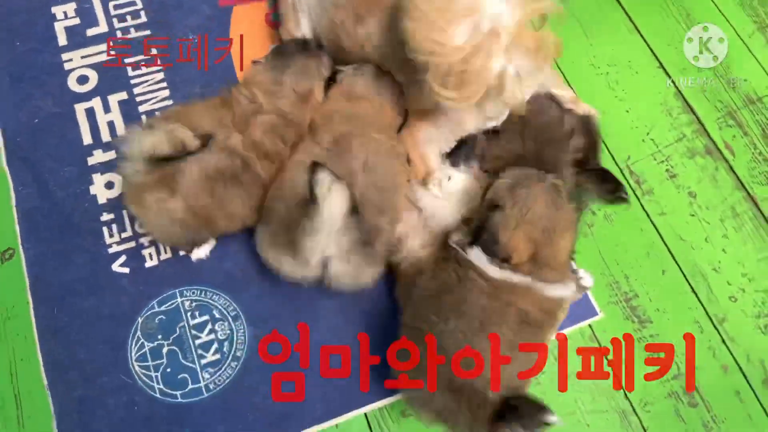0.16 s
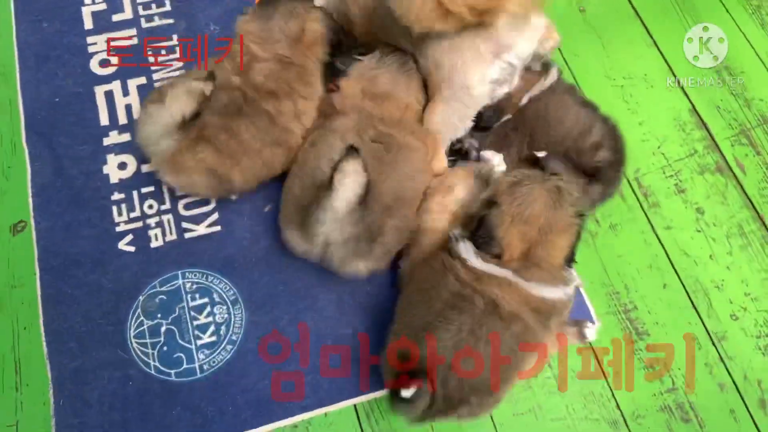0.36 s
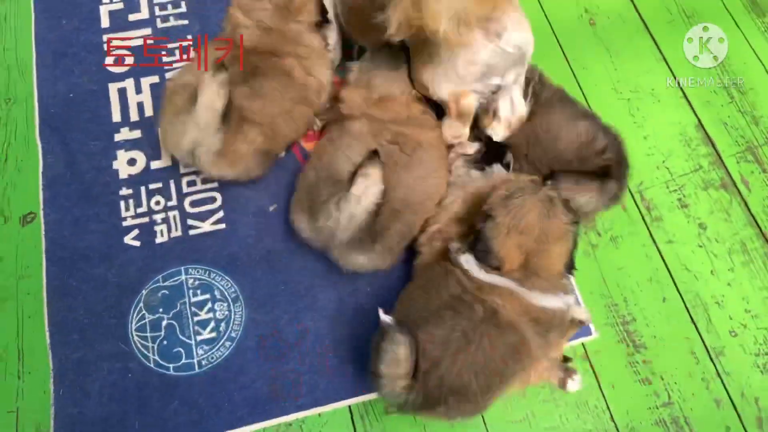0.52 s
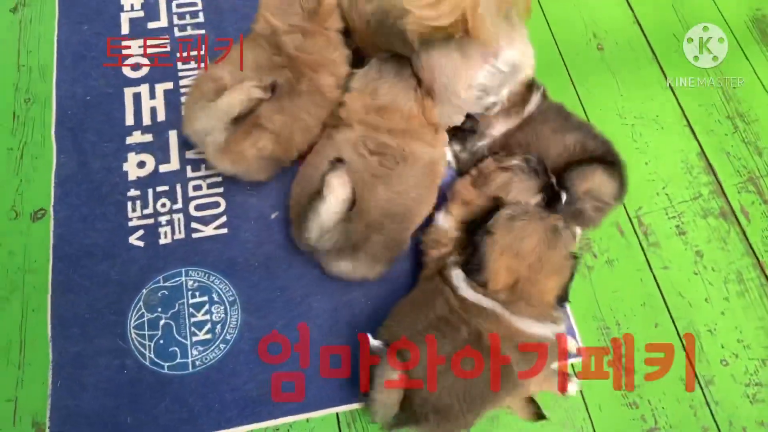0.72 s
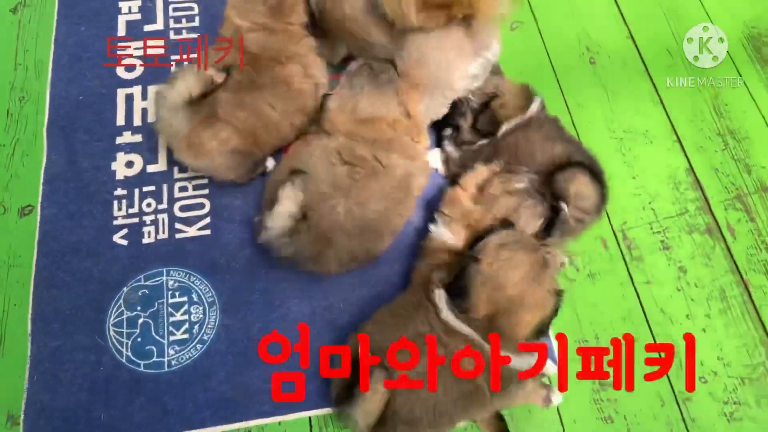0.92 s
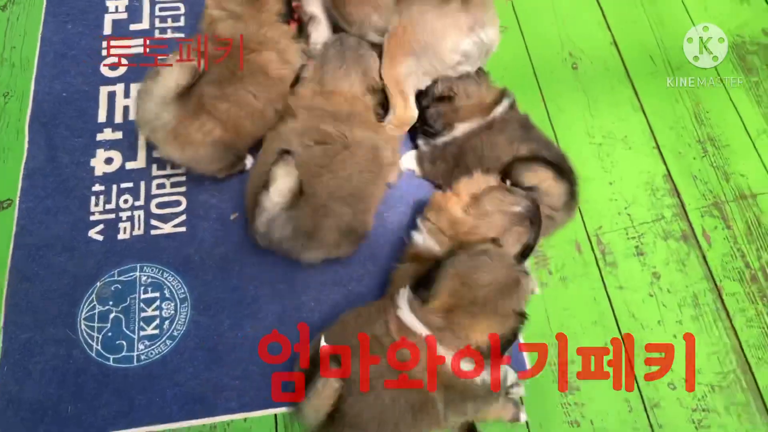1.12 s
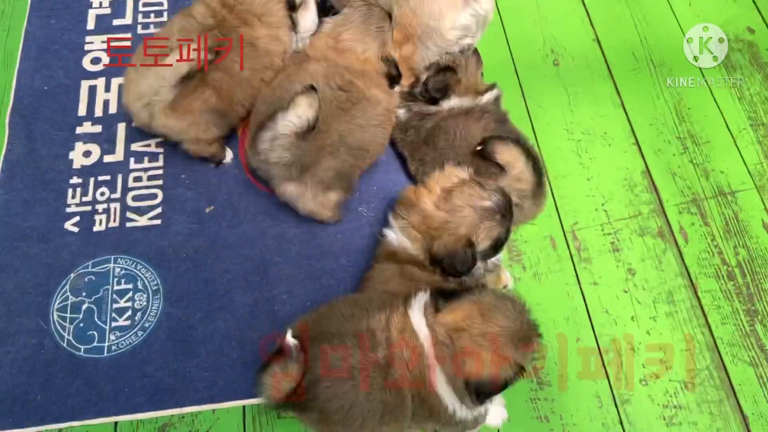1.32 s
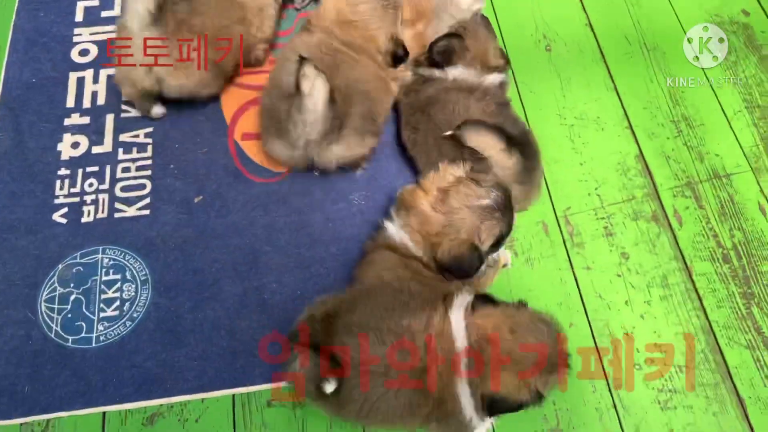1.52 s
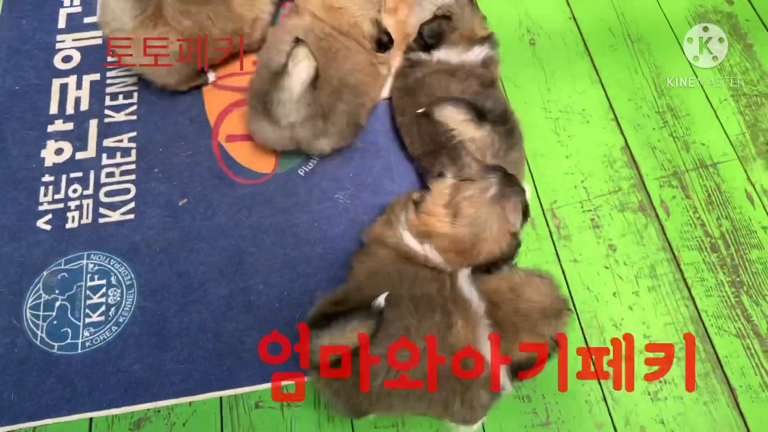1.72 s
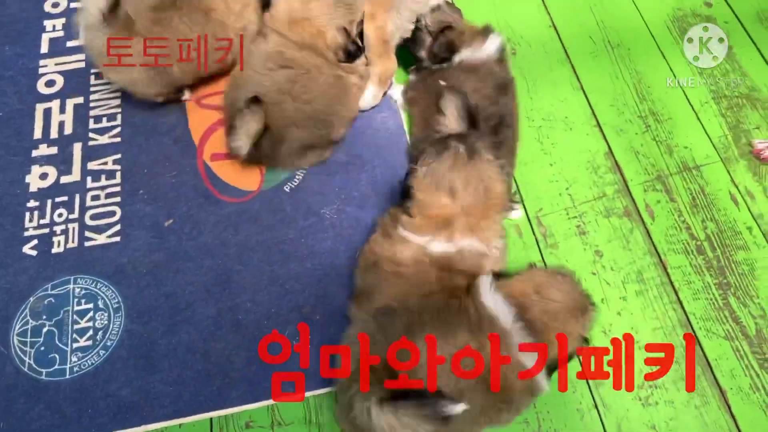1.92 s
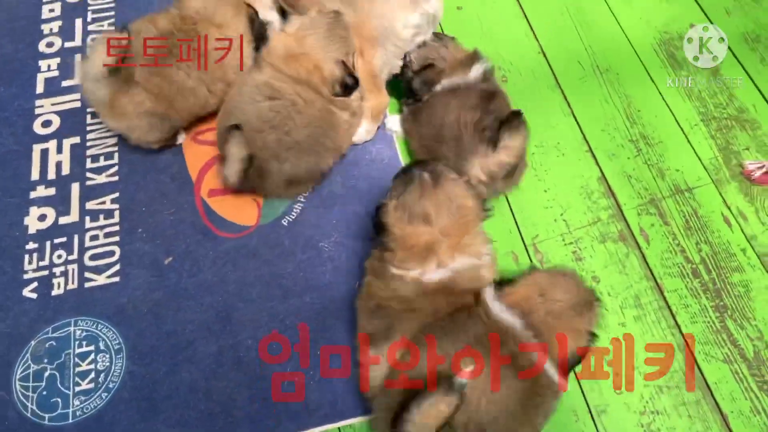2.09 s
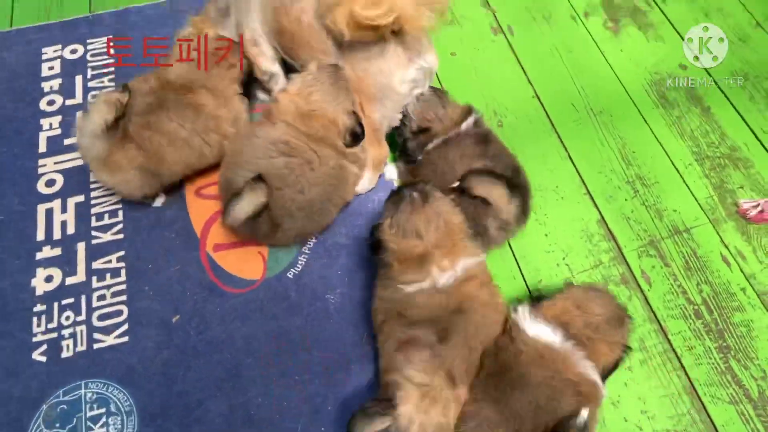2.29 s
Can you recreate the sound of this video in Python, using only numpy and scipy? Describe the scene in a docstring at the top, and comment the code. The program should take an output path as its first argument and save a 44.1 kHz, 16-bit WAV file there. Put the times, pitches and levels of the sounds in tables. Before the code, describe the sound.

Short yapping barks from several small dogs ring through a hard-walled room over low rumble

```python
"""First heard is the dying echo of a bark; small dogs then bark, two of them overlapping near 1.45 s, and one
whimpers faintly, further off in a hard-walled kennel room: jittered harmonics and gated breath through mouth
and throat. Close to the phone puppies scuff and scratch over a rubber mat: bursts of gritty noise for the rubs,
damped sines for claws and paws. Below lie a low machine rumble and a background hiss, both shaped noise;
the hiss swells and sinks as the recorder's gain changes."""
import sys
import numpy as np
from scipy import signal
from scipy.fft import rfft, irfft
from scipy.io import wavfile
from scipy.ndimage import uniform_filter1d, map_coordinates

SR = 44100
rng = np.random.default_rng(int(sys.argv[2]) if len(sys.argv) > 2 else 0)


def transcribe(u):
    """Save the signal u as a 16-bit wav file named by the first command-line argument.

    u: samples, shape (n,) or (channels, n), limited to [-1, 1]; the rate is SR.
    q: integer samples, one column per channel.
    """
    v = np.clip(np.atleast_2d(u).T, -1, 1)
    q = np.round(v * 32767).astype(np.int16)
    wavfile.write(sys.argv[1], SR, q)


N = 103635  # samples heard
LEAD_S = .3  # time computed before the start, so that the earlier bark still echoes


def undb(db):
    """Decibel law: amplitude ratio of a level."""
    return 10 ** (np.asarray(db) / 20)


def unit(x):
    """Normalisation to an rms value of one."""
    return x / np.sqrt(np.mean(x ** 2))


def shape(x, gain):
    """Linear filtering: the spectrum is multiplied by a gain that is a function of frequency."""
    n = x.shape[-1]
    hz = np.arange(n // 2 + 1) * SR / n + 1  # 1 Hz up, to avoid zero
    return irfft(rfft(x) * gain(hz), n)


def resonances(hz, table):
    """Resonance: sum of steep peaks, each given by f/Hz, width at half amplitude/Hz, level/dB."""
    return sum(undb(db) / (1 + ((hz / f - f / hz) * f / width) ** 2) for f, width, db in table)


def colour(table):
    """Spectral envelope: levels interpolated over log frequency."""
    f, db = np.array(table).T
    return lambda hz: undb(np.interp(np.log(hz), np.log(f), db))


def smooth_twice(x, size):
    """Low-pass smoothing by two running means."""
    return uniform_filter1d(uniform_filter1d(x, size), size)


def walk(rate):
    """Random modulation: levels held for 1 / rate s, slewed twice, of unit rms."""
    hold = int(SR / rate)
    steps = np.repeat(rng.standard_normal(N // hold + 1), hold)
    return unit(smooth_twice(steps, hold)[:N])


def from_mid_side(mid, side):
    """Sum and difference: left and right from the common and the opposed part."""
    return np.array([mid + side, mid - side])


PORT_LAG_S = 0.0004107


def later(x):
    """Time difference of arrival: the right port hears far sounds a little late."""
    right = map_coordinates(x[1], [np.arange(x.shape[1]) - PORT_LAG_S * SR], mode="nearest")
    return np.array([x[0], right])


# spectral envelope of the machine rumble, before its roll-off and overall level: f/Hz, relative level/dB per Hz
RUMBLE_SPECTRUM = [(12, -39), (20, -24), (28, -7.5), (48, -11.5), (62, -4.5), (81, -2.5), (180, -14),
                   (387, -23), (449, -19), (500, -30.5), (650, -57), (1100, -120)]


def machine_rumble():
    """Coherence of long waves: low noise is nearly alike on both ports, less so towards 800 Hz."""
    noise = rng.standard_normal((2, N))
    mid, side = shape(noise, lambda f: colour(RUMBLE_SPECTRUM)(f) / (1 + (f / 500) ** 6))
    side = shape(side, lambda f: np.clip(f / 800, .18, 1))
    level_db = -47 + 0.92 * walk(4.08)
    return later(unit(from_mid_side(mid, side))) * undb(level_db)


def hum():
    """Narrow-band resonance: noise through one peak, identical on both ports."""
    f_hz, width_hz, level_db = 76.8, 12, -50
    return unit(shape(rng.standard_normal(N), lambda f: resonances(f, [(f_hz, width_hz, 0)]))) * undb(level_db)


# spectral envelope of the hiss, before its low cut and level: f/Hz, relative level/dB per Hz
HISS_SPECTRUM = [(240, -38), (400, 2.5), (1120, 4.5), (1770, -1), (2220, -4.5), (4930, -11), (7810, -11),
                 (10300, -13), (14000, -17.5), (15600, -20)]
# course of the hiss, before the common lift: t/s, level/dB
HISS_COURSE = [(0.0, -59.5), (0.14, -52.5), (0.36, -46), (1.01, -64), (1.22, -65), (1.42, -49.5),
               (1.66, -66.5), (1.88, -55.5), (2.02, -53.5), (2.35, -63)]
HISS_LIFT_DB = 3.5


def background_hiss(t):
    """Amplitude modulation: wide diffuse noise swells and sinks as the recorder's gain changes."""
    noise = rng.standard_normal((2, N))
    mid, side = shape(noise, lambda f: colour(HISS_SPECTRUM)(f) / (1 + (450 / f) ** 6))
    level_db = np.interp(t, *np.array(HISS_COURSE).T) + HISS_LIFT_DB + 0.5 * walk(10.75)
    return unit(from_mid_side(mid, 1.25 * side)) * undb(level_db)


# fur and paws rub the mat: start t/s, rise/s, fade/s, bright-part level/dB,
# duller-part level re bright part/dB, duller-part f/Hz
SCUFFS = [(0.167, 0.0082, 0.0077, -44, -2.5, 5000), (.2, 0.039, 0.049, -61, -8, 5000),
          (.61, .01, .02, -64, 3, 5000), (.705, 0.026, 0.036, -51.5, -5.5, 3440),
          (.848, 0.0097, 0.03, -59, 7, 1890), (1.24, 0.022, .04, -61.5, -2, 4630),
          (1.44, 0.035, 0.047, -61, 12, 4960), (1.833, .005, .03, -58.5, -5, 3980),
          (2.16, 0.046, 0.038, -59.5, -6, 3850)]


def mat_scuffs(t):
    """Friction noise: short gritty rubs, bright on top with a duller resonant part."""
    bright_hz, bright_width_hz = 12700, 11000
    out = np.zeros(N)
    grit = rng.standard_normal(N) * undb(1.1 * walk(300))
    bright = unit(shape(grit, lambda f: resonances(f, [(bright_hz, bright_width_hz, 0)])))
    for start, rise, fade, db, dull_db, hz in SCUFFS:
        dull = unit(shape(grit, lambda f: resonances(f, [(hz, 1.58 * hz, 0)])))
        attack = np.sin(np.pi / 2 * np.clip((t - start) / rise, 0, 1))
        decay = np.exp(-(np.maximum(t - start - rise, 0) / fade) ** 2)
        out += undb(db) * attack * decay * (bright + undb(dull_db) * dull)
    return out


def damped_rings(t, events):
    """Damped free vibration: each impact starts a sine that falls to 1/e in 1.05 cycles."""
    out = np.zeros(N)
    for start, db, hz in events:
        since = np.maximum(t - start, 0)
        out += undb(db) * np.sin(2 * np.pi * hz * since) * np.exp(-since * hz / 1.05)
    return out


# paws bump the mat: t/s, undamped level/dB, ring f/Hz
BUMPS = [(0.409, -30.5, 88.5), (0.521, -29.5, 99), (0.866, -37.5, 192), (.902, -33.5, 610),
         (.925, -32.5, 222), (1.042, -44, 910)]


def paw_bumps(t):
    """Impact of a soft body: low, heavily damped rings."""
    return damped_rings(t, BUMPS)


# claws tick on the floor: t/s, undamped level/dB, ring f/Hz
TICKS = [(0.8333, -41, 3650), (0.953, -45, 2630), (1.042, -46, 3040), (1.069, -50, 14300),
         (1.1528, -45.5, 2780), (1.6854, -52, 2500), (1.8337, -50, 13900), (1.961, -44, 3430),
         (2.3167, -45.5, 3050)]


def claw_ticks(t):
    """Impact of a hard body: each ring carries a snap of equal level at 11 kHz."""
    snaps = [(start, db, 11000) for start, db, _ in TICKS]
    return damped_rings(t, TICKS + snaps)


# decay of the room: f/Hz, reverberation time/s
ROOM_T60 = [(300, 1), (800, 0.56), (1200, 0.56), (2500, 0.47), (5000, 0.57), (12000, 0.31)]
DIRECT_DB, LEFT_DB = -12.5, 2  # direct sound re echo energy; left port over right
BUILD_S, EARLY_DB, EARLY_S = 0.0047, 4, 0.024  # echo build-up time; early extra echo and its decay time
ALIKE = 0.31  # correlation of the echoes at the two ports


def room(x):
    """Reverberation: dense echoes build up and decay exponentially by band, partly alike at the two ports."""
    t = np.arange(SR) / SR
    f, t60 = np.array(ROOM_T60).T
    noise = rng.standard_normal((2, SR))
    echoes = 0
    for hz in 200 * 2. ** np.arange(7):  # overlapping octave bands
        band = shape(noise, lambda v: np.cos(np.pi / 2 * np.clip(np.log2(v / hz), -1, 1)) ** 2)
        echoes = echoes + band * undb(-60 * t / np.interp(np.log(hz), np.log(f), t60))
    build_up = 1 - np.exp(-t / BUILD_S)
    early = 1 + undb(EARLY_DB) * np.exp(-t / EARLY_S)
    echoes = echoes * build_up * early
    echoes = echoes / np.sqrt(np.sum(echoes ** 2, axis=1, keepdims=True))
    right = ALIKE * echoes[0] + np.sqrt(1 - ALIKE ** 2) * echoes[1]
    responses = np.array([echoes[0], right])
    responses[:, 0] = undb(DIRECT_DB)  # the direct sound
    wet = signal.fftconvolve(x[None], responses, axes=1)[:, :len(x)]
    return later(wet) * undb([[LEFT_DB / 2], [-LEFT_DB / 2]])


def call(t, gesture, jitter, breath_db, mouth_width_hz, hiss_db, throat):
    """Source-filter principle: vocal pulses and breath gated once a cycle excite a moving mouth and the throat."""
    ts, hz, db, mouth_hz, upper_db = np.array(gesture).T

    def tract(f, s):
        mouth = resonances(f, [(np.interp(s, ts, mouth_hz), mouth_width_hz, 0)])
        return mouth + undb(np.interp(s, ts, upper_db)) * resonances(f, throat)

    on = (t >= ts[0]) & (t <= ts[-1])
    s = t[on]
    wobble = unit(smooth_twice(rng.standard_normal(len(t)), 100))[on]
    pitch = np.interp(s, ts, hz) * (1 + min(jitter, .012) * wobble)
    phase = 2 * np.pi * np.cumsum(pitch) / SR

    harmonic = np.arange(1, 16)[:, None]
    gains = tract(harmonic * pitch, s)
    voice = np.sum(gains * np.cos(harmonic * phase), axis=0)
    voice = voice / np.sqrt(np.sum(gains ** 2, axis=0) / 2)  # even level as the tract moves

    air = rng.standard_normal(len(t))[on] * (1 + 1.1 * np.cos(phase))
    f, at, spectrum = signal.stft(air, SR, nperseg=512)
    filtered = spectrum * tract(f[:, None] + 1, at + s[0]) ** 1.067
    breath = unit(signal.istft(filtered, SR)[1][:len(s)])
    hiss = unit(shape(air, lambda f: resonances(f, [(8300, 9000, 0)])))  # faint and broad

    out = np.zeros(len(t))
    out[on] = undb(np.interp(s, ts, db)) * (voice + undb(breath_db) * breath + undb(hiss_db) * hiss)
    return out


# each call before the room: barks, and one faint low whimper at .62 s; in three parts:
#   gesture: t/s, pitch f/Hz, voice level/dB, mouth resonance f/Hz, upper-throat level/dB
#   hoarseness: pitch jitter/share (held to .012 at most), breath level re voice/dB, mouth width/Hz,
#     treble hiss level re voice/dB
#   upper throat: f/Hz, width/Hz, level/dB
CALLS = [ ([(-.2, 695, -37, 830, 8), (-.18, 821.3, -28.5, 830, -5), (-.05, 827.3, -33, 856, -1.5),
         (-.02, 749, -41, 830, 6)], (.012, -2.5, 298, -38), [(1390, 310, -11.5), (3100, 400, -23),
         (5000, 1500, -56)]), ([(.172, 598, -36, 1240, -12), (.18, 627.7, -31, 1160, -10),
         (.192, 698, -29.5, 1120, -18), (.205, 808.6, -26.5, 850, 2.5), (.25, 814.6, -33.5, 794, -1),
         (.275, 770.4, -25, 735, -17), (.3, 715, -34, 750, -6), (.315, 735, -47, 720, -12)],
         (0.02, -7.5, 461, -36), [(1560, 140, -5.5), (3186, 124, -5.5), (5240, 1300, -56)]),
         ([(.325, 363.4, -44, 1090, 14.5), (.345, 368.6, -27, 1090, 8), (.365, 379.6, -21.5, 1130, 4.5),
         (.385, 393.2, -17.5, 1160, 0.5), (.42, 397.4, -16.5, 1184, -2.5), (.445, 414.7, -19.5, 1236, 1),
         (.475, 393.4, -23, 1206, -5.5), (.5, 384, -36.5, 1256, 3)], (0.4, -7, 94, -30.5),
         [(1850, 950, -22.5), (2510, 230, -27), (5020, 540, -37)]), ([(.62, 460, -65, 467, 3),
         (.66, 439.3, -57, 450, 5), (.71, 430.4, -59, 450, -2), (.79, 328.4, -62.5, 330, -2),
         (.83, 301, -70, 290, 11.5)], (.012, 8.5, 130, -40), [(930, 300, -10.5)]),
         ([(1.185, 324.3, -41, 1000, -10), (1.205, 332.6, -22.5, 1010, -12.5),
         (1.225, 420.7, -20.5, 843, -9), (1.265, 429.5, -17.5, 864, -4.5), (1.295, 416.3, -26.5, 854, 1.5),
         (1.32, 368, -34, 740, 3), (1.345, 323, -46, 660, -4)], (0.17, -2, 173, -37), [(1338, 128, -4),
         (2830, 650, -28), (4840, 870, -64)]), ([(1.395, 382.5, -49.5, 1500, 13),
         (1.42, 380.5, -30.5, 1510, -2.5), (1.45, 396.6, -27.5, 1590, -1.5),
         (1.48, 402.4, -35.5, 1520, 3.5), (1.5, 390, -58, 1560, 5)], (.008, 4.5, 308, -24.5),
         [(883, 630, 0.5), (3100, 120, -11.5), (5000, 4500, -32.5)]), ([(1.44, 332.9, -26, 1010, -3),
         (1.47, 340, -20.5, 1030, -8.5), (1.51, 351.9, -21, 1085, -5.5), (1.545, 364.1, -26, 1127, -5),
         (1.575, 363.7, -25, 1120, -11), (1.6, 338, -38.5, 1080, 8.5)], (0.6, -6.5, 98, -32.5),
         [(433, 110, -22), (1606, 344, -9.5), (2650, 710, -26)]), ([(1.913, 513.7, -48, 1170, -10),
         (1.93, 528, -16.5, 1020, -22), (1.952, 618, -24, 1160, -10), (1.962, 517.7, -22, 980, -7.5),
         (1.972, 804, -20, 924, -6), (1.988, 843.3, -18, 863, 0), (2.02, 843, -25, 843, 0),
         (2.04, 742, -28, 740, -12.5), (2.06, 667, -36, 685, -16)], (.003, -8.5, 304, -42), [(1542, 160, 2),
         (3270, 440, -18), (4180, 170, -31), (5120, 130, -36.5)]), ]


def dogs(t):
    """Superposition: the calls add, each with its own gesture, hoarseness and throat."""
    return sum(call(t, gesture, *hoarseness, throat) for gesture, hoarseness, throat in CALLS)


def scene():
    """Superposition of the far dogs in their room, the near mat and the background."""
    lead = int(LEAD_S * SR)
    t_all = (np.arange(N + lead) - lead) / SR
    t = t_all[lead:]
    background = machine_rumble() + hum() + background_hiss(t)
    mat = mat_scuffs(t) + paw_bumps(t) + claw_ticks(t)
    return background + mat + room(dogs(t_all))[:, lead:]


def record(dry):
    """Mid-side filtering: the common part dips in the low treble, width shrinks above; the phone cuts the top."""
    dip_hz, dip_width_hz, dip_share = 8760, 2540, 0.68
    low_cut_hz, side_top_hz, top_hz = 31, 10800, 15720
    mid = shape((dry[0] + dry[1]) / 2, lambda f: 1 - dip_share * resonances(f, [(dip_hz, dip_width_hz, 0)]))
    mid = shape(mid, lambda f: 1 / (1 + (low_cut_hz / f) ** 4))
    side = shape((dry[0] - dry[1]) / 2, lambda f: .1 + 0.71 / (1 + (f / side_top_hz) ** 16))
    top_cut = signal.ellip(12, .2, 80, top_hz, fs=SR, output="sos")
    return signal.sosfilt(top_cut, from_mid_side(mid, side))


dry = scene()
out = record(dry)
transcribe(out)
```